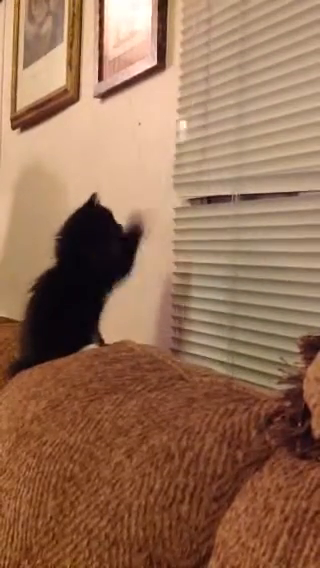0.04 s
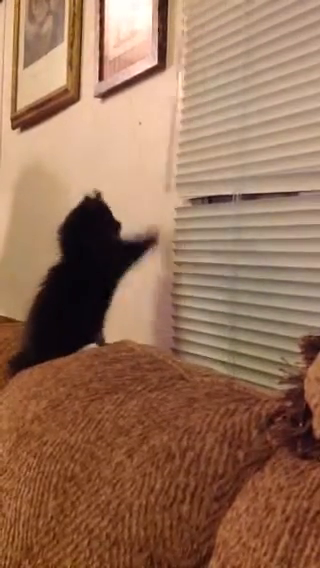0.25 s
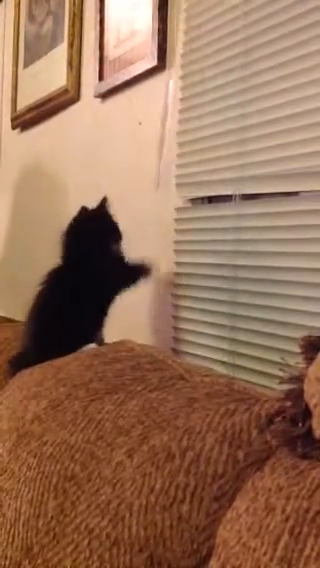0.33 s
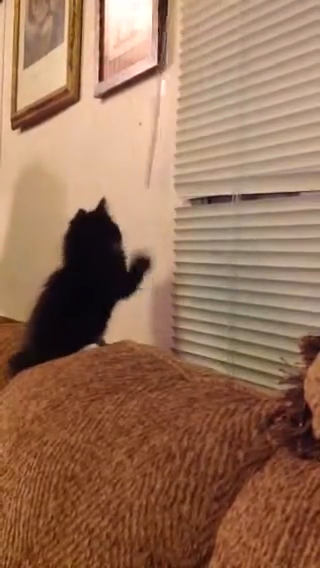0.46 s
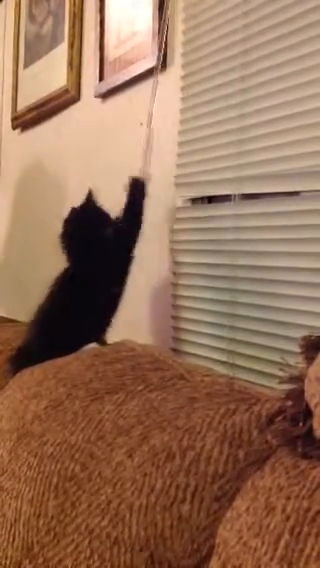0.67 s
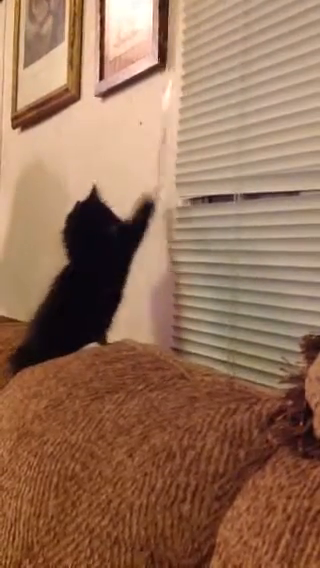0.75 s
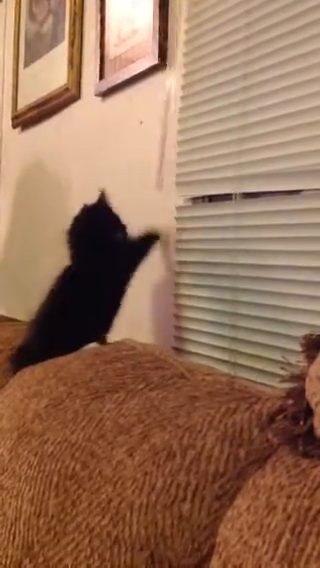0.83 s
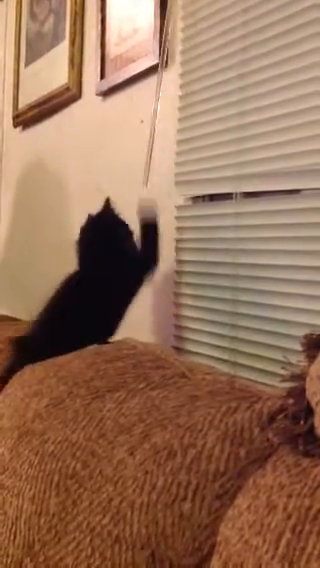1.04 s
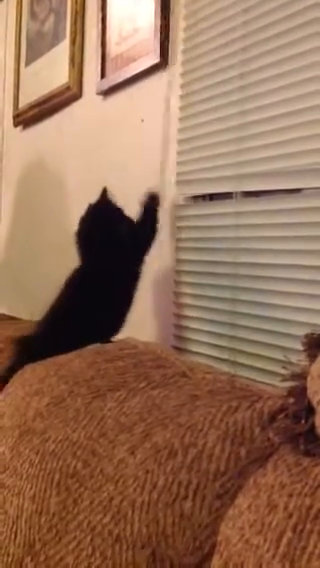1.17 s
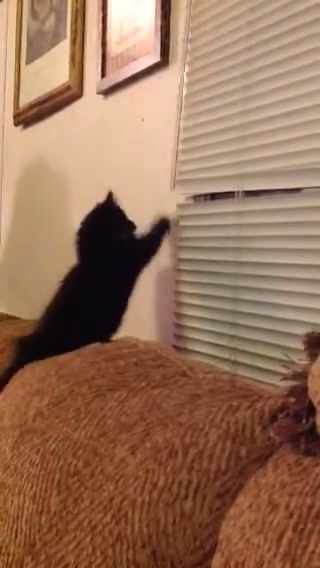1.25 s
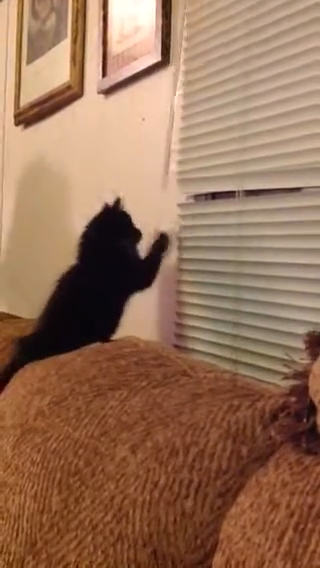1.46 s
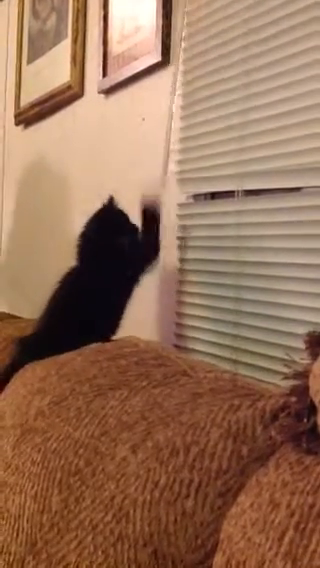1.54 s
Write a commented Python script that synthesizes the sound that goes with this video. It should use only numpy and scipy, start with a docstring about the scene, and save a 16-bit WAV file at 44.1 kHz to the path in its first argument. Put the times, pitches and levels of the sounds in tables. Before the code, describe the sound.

Window blinds clack sharply as a kitten bats the hanging wand in a quiet room.

```python
"""Bright plastic clacks sound in a quiet living room as a kitten swats a blind's hanging cord wand. Each impact
on the slats is a burst of chatter that sets the wand's modes ringing. Twice the wand swings on to knock hard
against the window frame, which rings hollow; then it ticks as it settles. Paw and cord brush softly in between,
the kitten lands softly on the sofa once, and one dry bump sounds close to the microphone. Soft air noise and a
faint mains hum lie under it all."""
import sys
import numpy as np
from scipy import signal
from scipy.fft import rfft, irfft
from scipy.io import wavfile
from scipy.ndimage import uniform_filter1d

SR = 44100
rng = np.random.default_rng(int(sys.argv[2]) if len(sys.argv) > 2 else 0)


def pcm_store(signal):
    """Save signal as 16-bit PCM."""
    levels = np.round(np.clip(np.atleast_2d(signal), -1, 1) * 32767)
    wavfile.write(sys.argv[1], SR, levels.astype(np.int16).T)


N = 70560
TIME = np.arange(N) / SR

# Wand impacts on the slats, plus one faint tick belonging to the close bump.
# Each row: start in seconds, level in dB, tilt in dB per octave, chatter decay time in seconds,
# room tail in dB, wand ring in dB, most excited frequency in Hz.
CLACKS = [(0.2409, -29.5, 6.5, 0.0042, -8.5, -40, 9000), (0.2507, -22.5, 8, 0.0095, -15, -23, 6200),
          (0.2555, -20, 0, 0.0046, -11, -20, 2400), (0.2616, -28, -3.4, 0.0069, -6.5, -26, 1700),
          (.316, -54, 19, 0.01, -18, -20, 2400), (0.384, -32, -4, 0.0011, -13, -29, 9000),
          (.3974, -61, -2, .0005, -18, -36, 9000), (0.4396, -33.5, 4.5, 0.0016, -10.5, -38, 7000),
          (0.4439, -40, 1, 0.0037, -6, -18.5, 1690), (.492, -43.5, -5, 0.0023, -8, -9.5, 3000),
          (0.806, -25.5, 1, 0.015, -17.5, -14, 4500), (.8396, -15.5, 8, 0.0021, -22, -38, 9000),
          (1.0473, -45.5, -5, 0.0088, -10, -9.5, 3380), (1.1044, -51, -2, 0.003, -6.5, -10, 6800),
          (1.2485, -30.5, -1, 0.0072, -6, -23, 3400), (1.275, -43, -6.5, 0.008, -1, -20, 2000),
          (1.313, -39.5, 12, .015, -11, -13, 3400), (1.406, -49.5, -4, 0.023, -8, -6, 3200),
          (1.488, -55, 10, 0.0068, -6.5, -13, 3200)]
# Impacts of the wand on the frame. Each row: start in seconds, level in dB, tilt in dB per octave,
# crack in dB, frame ring in dB, most excited frequency in Hz.
FRAME_IMPACTS = [(.8329, -23, -0.5, 18.5, -4.5, 277), (1.2835, -27.5, 0, 19.5, -3.5, 540)]
# Touches of paw and cord, and one soft thud as the kitten lands on the sofa. Each row: start in seconds, level
# in dB, tilt in dB per octave, decay time in seconds.
SOFT_TOUCHES = [(0.22, -59.5, 0, 0.018), (.321, -53.5, -5, 0.032), (0.55, -53, 2, 0.012),
                (0.7376, -50, 5, 0.0065), (1.167, -53, 2, 0.01), (1.178, -49.5, 0.5, 0.0083),
                (1.445, -59, 5, 0.06)]
# Normal modes of wand and frame. Each row: frequency in Hz, level in dB, 60 dB decay time in seconds.
WAND_MODES = [(1683, 0, 0.5), (2384, -1, 0.2), (3200, -2.5, 0.34), (3450, -5.5, 0.3), (3750, -9, 0.22),
              (4547, -8, .26), (5000, -4.5, 0.12), (6212, 2.5, .12), (6800, 8, 0.054), (7080, -1, 0.08)]
FRAME_MODES = [(345.2, -2.5, 0.31), (488, -14.5, 0.37), (576.7, 2, 0.18), (619, -18, 0.36), (721, -9, .22),
               (865, -16, 0.75), (1081, -10, 0.46), (1170, -5, 0.33), (1344, -17, 0.62), (1460, -10, 0.16),
               (1650, -3.5, 0.28), (1752, -9, 0.23), (1880, -11, 0.19)]
# Modes of the bump. Each row: frequency in Hz, level in dB, 60 dB decay time in seconds, lag in seconds.
BUMP_MODES = [(4500, -23, 0.0049, 0.000053), (2820, -23.5, 0.0062, 0.00016), (2250, -33.5, 0.011, 0.00014),
              (1340, -20, 0.0082, 0.00031), (685, -23, 0.017, 0.00049), (460, -27, 0.02, 0.002),
              (283, -23.5, 0.015, 0.0022)]
# Reflections from wall, glass and ceiling. Each row: delay in seconds, level in dB.
EARLY_REFLECTIONS = [(.0028, -18), (.0053, -10), (0.0114, -18)]
# Noise spectra of the contacts and the air. Each row: frequency in Hz, relative spectral density in dB.
CLACK_SPECTRUM = [(150, -49), (400, -25.5), (900, -15.5), (1800, -9), (3500, -8.5), (6000, -4.5),
                  (9000, 0.5), (13000, 5), (15200, -6.5)]
KNOCK_SPECTRUM = [(80, -33), (160, 0.5), (350, 0), (650, -0.5), (1100, -1), (1800, 3.5), (3200, -2.5),
                  (5000, -2), (9000, 0.5), (13000, -6), (15500, -12)]
BRUSH_SPECTRUM = [(100, -15), (250, 2), (650, 0.5), (1100, -3.5), (1900, -0.5), (4000, -12.5),
                  (7000, -18.5), (15000, -26)]
AIR_SPECTRUM = [(25, -3.5), (60, 1), (95, 5), (150, -4), (235, -0.5), (330, -4), (480, -12), (630, -8),
                (800, -12.5), (1200, -15), (2000, -20), (4000, -25.5), (8000, -26), (15000, -27.5)]
# Partials of the mains hum. Each row: frequency in Hz, rms level in dB before the bass cut.
HUM_PARTIALS = [(120, -57), (240, -67), (599, -67)]


def clacks(waver):
    """Impact excitation: the wand chatters on the slats and rings; one faint tick belongs to the bump."""
    out = 0
    for start, db, tilt, decay_s, room_db, ring_db, favoured_hz in CLACKS:
        chatter = contact(CLACK_SPECTRUM, tilt, decay_s, room_db, tail_t60=0.35)
        wand = from_db(ring_db) * ring(WAND_MODES, favoured_hz, waver)
        out = out + delayed(from_db(db) * (chatter + wand), start)
    return out


def frame_knocks(waver):
    """Impulse response: a hard knock cracks, then the slats rattle and the frame resonates."""
    out = 0
    for start, db, tilt, crack_db, ring_db, favoured_hz in FRAME_IMPACTS:
        rattle = contact(KNOCK_SPECTRUM, tilt, decay_s=0.0044, room_db=-3, tail_t60=0.31)
        frame = from_db(ring_db) * ring(FRAME_MODES, favoured_hz, waver)
        knock = from_db(crack_db) * crack() + delayed(rattle + frame, seconds=0.0008)
        out = out + from_db(db) * delayed(knock, start)
    return out


def crack():
    """Early reflection: a band-limited pulse arrives directly, then again from nearby surfaces."""
    impulse = (TIME == 0) + 1e-18
    pulse = butterworth(impulse, "band", order=1, hz=[1090, 5840])
    pulse = butterworth(pulse, "low", order=1, hz=13800)
    pulse = -pulse / np.abs(pulse).max()
    return pulse + sum(from_db(db) * delayed(pulse, lag) for lag, db in EARLY_REFLECTIONS)


def close_bump(start_s=0.3938):
    """Direct sound: heavily damped modes, high first and low last, too near to carry any room."""
    out = 0
    for hz, db, t60, lag in BUMP_MODES:
        mode = np.sin(2 * np.pi * hz * TIME) * from_db(db - 60 * TIME / t60)
        out = out + delayed(mode, start_s + lag)
    return out


def brushes():
    """Soft contact: paw, cord and the kitten landing on the sofa excite little treble, so these touches sound
    dull."""
    return sum(delayed(from_db(db) * contact(BRUSH_SPECTRUM, tilt, decay_s, room_db=-8, tail_t60=0.55), s)
               for s, db, tilt, decay_s in SOFT_TOUCHES)


def room_tone(air_db=-56.5):
    """Noise floor: steady mains partials lie in broadband air noise."""
    hum = sum(from_db(db) * rms_one(np.sin(2 * np.pi * (hz * TIME + rng.random())))
              for hz, db in HUM_PARTIALS)
    return from_db(air_db) * noise(AIR_SPECTRUM) + hum


def contact(spectrum, tilt_db, decay_s, room_db, tail_t60):
    """Reverberation: a burst of uneven chatter leaves a diffuse tail that decays exponentially."""
    grain_s, grain_db, usual_decay_s = 0.0004, 4, 0.0041
    jitter = rms_one(uniform_filter1d(rng.standard_normal(N), int(grain_s * SR)))
    grain = rms_one(from_db(grain_db * np.tanh(jitter)))
    burst = grain * rise(seconds=0.0001) * np.exp(-TIME / decay_s)
    room_feed = np.sqrt(decay_s / usual_decay_s)  # longer contacts feed more sound into the room
    tail = room_feed * rise(seconds=0.00083) * from_db(room_db - 60 * TIME / tail_t60)
    return burst * noise(spectrum, tilt_db) + tail * noise(spectrum, tilt_db)


def ring(modes, favoured_hz, waver, fall_db_per_octave=5.5):
    """Modal superposition: where a body is struck decides which of its damped modes ring most."""
    t = TIME[:SR // 2]
    out = np.zeros(N)
    for hz, db, t60 in modes:
        tone = np.exp(2j * np.pi * hz * t) * np.roll(waver, rng.integers(N))[:len(t)]
        excited_db = db - fall_db_per_octave * abs(np.log2(hz / favoured_hz))
        out[:len(t)] += tone.imag * from_db(excited_db - 60 * t / t60)
    polarity = rng.choice([-1, 1])
    return polarity * out * rise(seconds=0.00083)


def room_waver(depth=0.88, rate_hz=26):
    """Interference: a tone swells and fades among its reflections; a complex gain, mean power near 1."""
    in_phase, quadrature = (rms_one(butterworth(rng.standard_normal(2 * N), "low", 2, rate_hz)[N:])
                            for _ in range(2))
    return (1 + depth * (in_phase + 1j * quadrature)) / np.sqrt(1 + 2 * depth ** 2)


def noise(spectrum, tilt_db=0):
    """Spectral shaping: white noise takes on a spectrum, tilted by tilt_db per octave; rms 1."""
    octave = np.log2(np.maximum(np.fft.rfftfreq(N, 1 / SR), 1))
    hz, db = np.transpose(spectrum)
    knots = np.log2(hz)
    shape_db = np.interp(octave, knots, db) + tilt_db * np.clip(octave, knots[0], knots[-1])
    bass_rolloff = np.minimum(2 ** (octave - knots[0]), 1) ** 2
    return rms_one(irfft(rfft(rng.standard_normal(N)) * from_db(shape_db) * bass_rolloff, N))


def butterworth(x, kind, order, hz):
    """Filtering with a maximally flat passband."""
    return signal.sosfilt(signal.butter(order, hz, kind, fs=SR, output="sos"), x)


def rise(seconds):
    """Exponential build-up toward 1 with the given time constant."""
    return 1 - np.exp(-TIME / seconds)


def delayed(x, seconds):
    """Time shift: the same sound, starting later."""
    return np.concatenate([np.zeros(int(seconds * SR)), x])[:N]


def from_db(db):
    """Amplitude ratio of a level in decibels."""
    return 10 ** (np.asarray(db) / 20)


def rms_one(x):
    """Normalisation to rms 1."""
    return x / np.sqrt(np.mean(x ** 2) + 1e-20)


def scene():
    """Superposition: the pressures of all sources add at one microphone."""
    waver = room_waver()
    return (clacks(waver) + frame_knocks(waver) + brushes() + close_bump() + room_tone())[None]


def record(dry, low_cut_hz=165, high_cut_hz=15600):
    """Band limiting: the small microphone drops the bass, and the top is cut steeply."""
    thin = butterworth(dry, "high", order=4, hz=low_cut_hz)
    return signal.sosfilt(signal.ellip(10, 0.1, 70, high_cut_hz, fs=SR, output="sos"), thin)


dry = scene()
out = record(dry)
pcm_store(out)
```